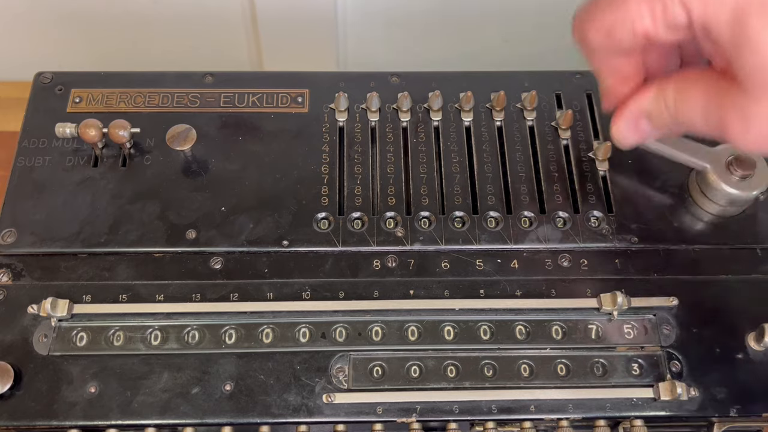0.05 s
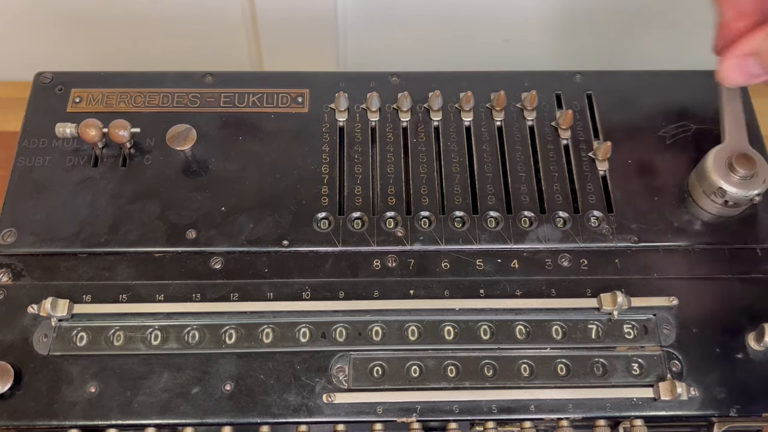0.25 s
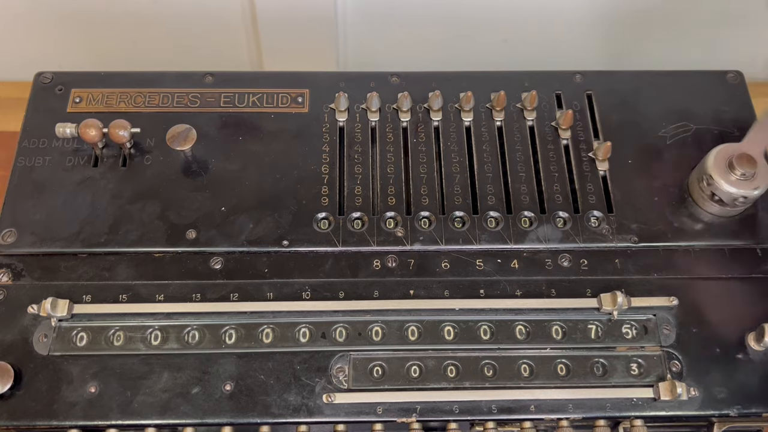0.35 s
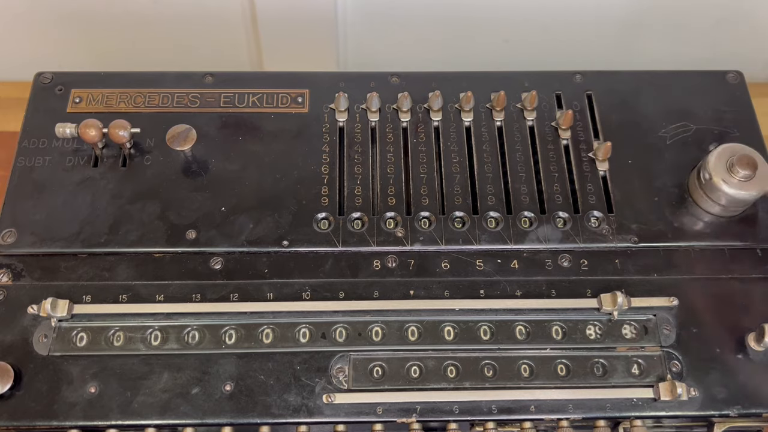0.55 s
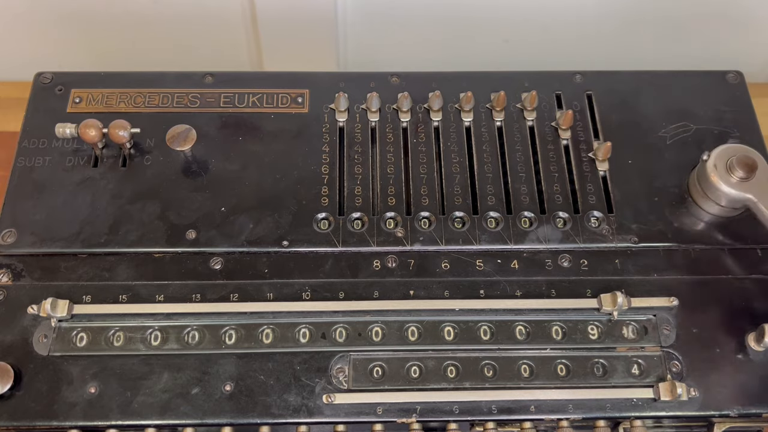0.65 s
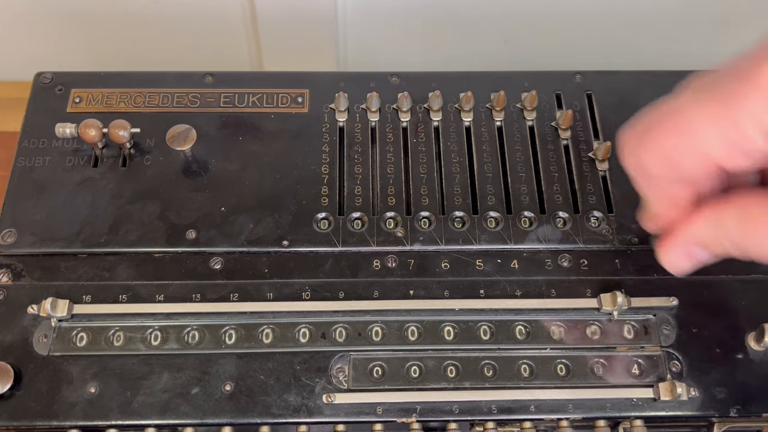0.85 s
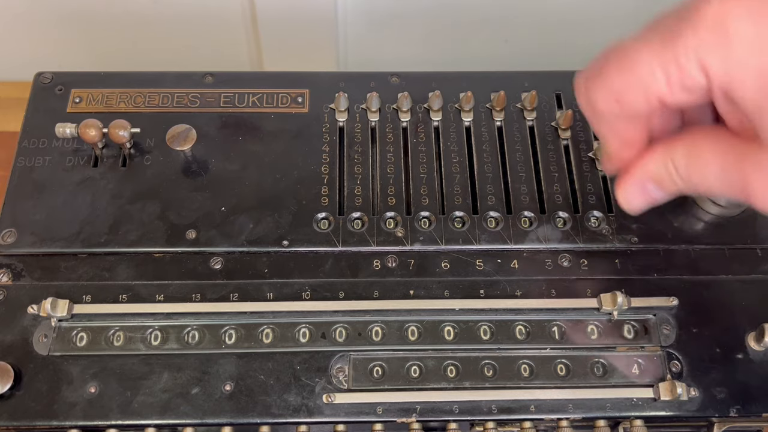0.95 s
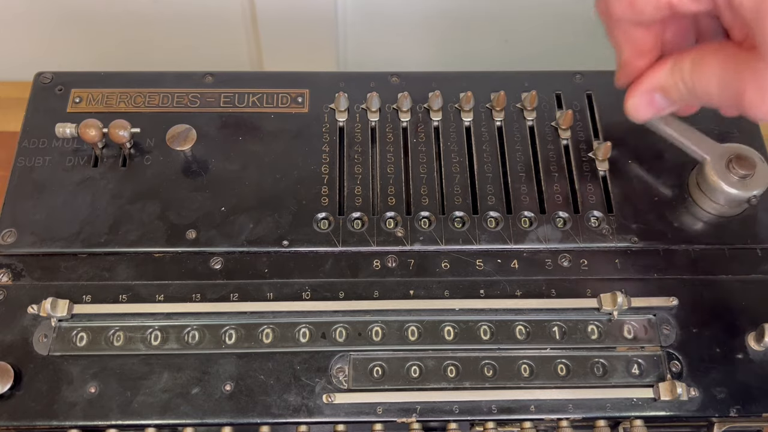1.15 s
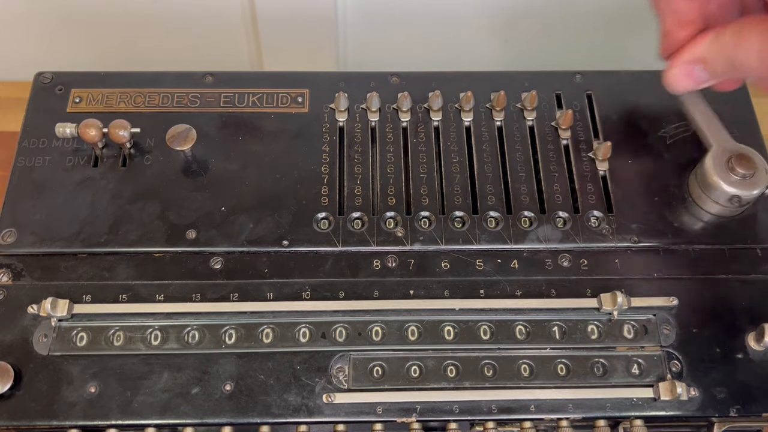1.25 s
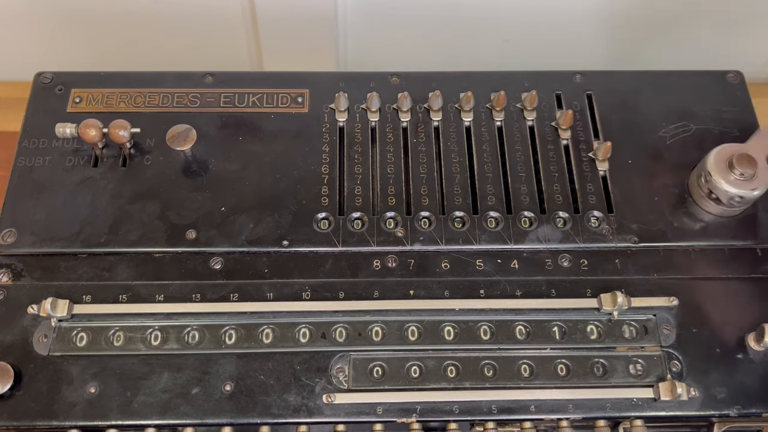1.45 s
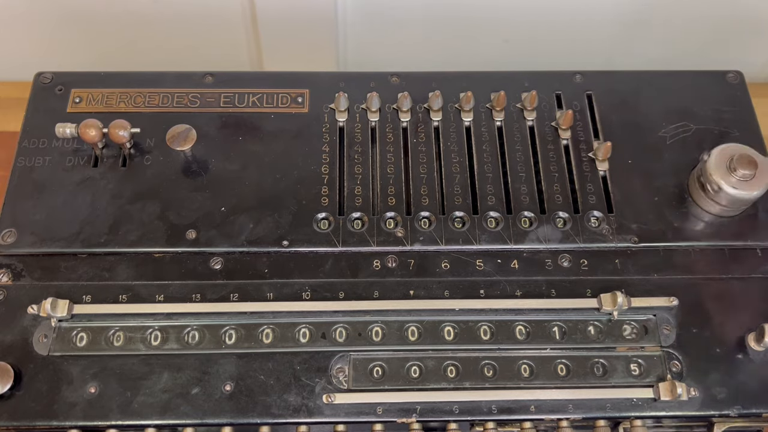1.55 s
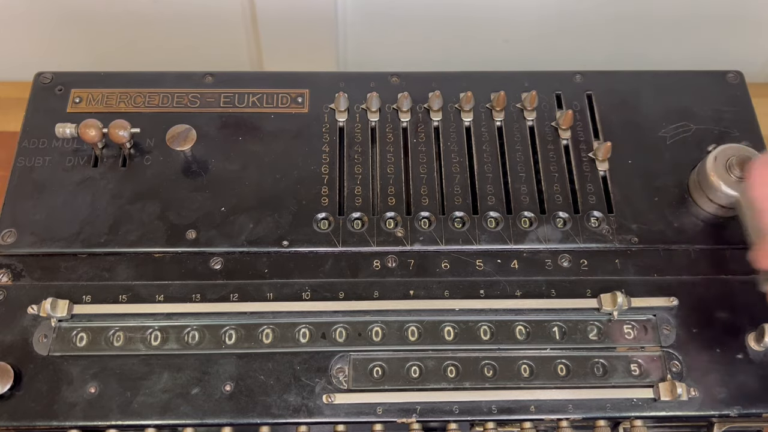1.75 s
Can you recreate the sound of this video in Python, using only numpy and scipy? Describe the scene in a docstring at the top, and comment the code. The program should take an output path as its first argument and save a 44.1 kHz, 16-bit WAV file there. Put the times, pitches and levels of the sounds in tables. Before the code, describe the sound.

A hand-cranked mechanical calculator turns twice, with ratcheting clatter and two loud clunks.

```python
"""Hand-cranked calculating machine

The crank of an old steel calculating machine is turned twice, close by, in a small room. In each turn
pawls tick over running gears, and the racks slide up, hit their stop with a loud clunk and slide back.
Between the turns the crank knocks through its rest position and the case drones. Impact and friction
excite the resonances of frame and case, and the sound dies away in a short diffuse ring."""
import sys
import numpy as np
from scipy import signal
from scipy.fft import rfft, irfft, next_fast_len
from scipy.io import wavfile

SR = 44100
rng = np.random.default_rng(int(sys.argv[2]) if len(sys.argv) > 2 else 0)


def unload_wav(signal):
    """Save mono or channel-first audio to the path in sys.argv[1] as 16-bit WAV at rate SR, clipped to [-1, 1]."""
    wavfile.write(
        sys.argv[1],
        SR,
        np.round(np.clip(np.atleast_2d(signal).T, -1, 1) * 32767).astype(np.int16),
    )


N = 79380
T = np.arange(N) / SR
EVENT_T = T[:SR // 3]

# Racks hitting their stop (all levels are relative): start_s, level_db, rise_s, t60_s
RACK_CLUNKS = [(0.236,-18,0.0034,0.031),(1.3162,-22.5,0.0027,0.022),(1.3238,-27,0.00064,0.043)]
# Racks sliding along their guides: start_s, rise_s, hold_s, level_db
RACK_SLIDES = [(.210,0.0088,0.0039,-32),(0.332,0.0011,0.029,-41),(0.379,0.0017,0.008,-41),(0.427,0.015,0.0069,-39.5),(0.487,0.0035,0.0072,-42.5),(0.642,0.0089,0.011,-52),(0.682,0.0043,0.0021,-48),
               (0.826,0.0017,0.027,-47),(0.87,0.02,0.0066,-46.5),(1.202,0.0082,0.05,-58.5),(1.276,0.006,0.0063,-44),(1.29,0.0052,0.0098,-35.5),(1.417,0.00092,0.028,-40.5),(1.453,0.0086,0.0049,-39),(1.481,0.0028,0.034,-44.5),(1.542,0.0072,0.0055,-40.5),(1.646,0.0018,0.0024,-45)]
# Clicks of pawls and gear teeth: start_s, level_db, pitch_hz
PAWL_CLICKS = [(.0121,-42,4850),(.035,-38.5,4670),(.0497,-38.5,5630),(.0565,-37,6280),(.0711,-38.5,5900),(.086,-38.5,6750),
               (.1059,-40,5100),(.1178,-40,6400),(.1324,-36.5,6300),(.1407,-51,5540),(.1575,-34,6600),(.1837,-59,6430),(.1985,-42,5500),
               (.3341,-42,5700),(.3618,-38,11700),(.380,-34.5,6970),(.3939,-39,5950),(.4311,-35,5760),(.439,-30,6270),(.4835,-34,5820),(.4946,-34.5,6000),
               (.521,-42,5400),(.5364,-45.5,5400),(.5481,-31.5,5680),(.5674,-42.5,5070),(.5893,-44,5030),(.5954,-42.5,5560),(.6038,-40.5,5620),(.6345,-47.5,4670),
               (.780,-43,6300),(.811,-38.5,5070),(.829,-37.5,6050),(.8412,-42.5,5060),(.8717,-40,5560),(.8821,-38,4880),(.9011,-43,5470),(.9117,-40,5300),(.9373,-46,5600),(.9589,-45,4440),
               (.9843,-33,5410),(1.0057,-42,4300),(1.0529,-37,5830),(1.0633,-51,5800),(1.0819,-43,5340),(1.0892,-42,6700),(1.1125,-44.5,6330),
               (1.1312,-41,6100),(1.1365,-45.5,4810),(1.1608,-48.5,5640),(1.1768,-37.5,5930),(1.1971,-59,6000),(1.2016,-39,6200),(1.2261,-34,6730),(1.2586,-50,5650),(1.2741,-42,5800),
               (1.4595,-31.5,6200),(1.4967,-41,6060),(1.5016,-40,5500),(1.5118,-27.5,6090),(1.5478,-42,5770),(1.5998,-39.5,5200),(1.6095,-46,5840),(1.6188,-50,5800),(1.629,-48,6000),
               (1.6347,-42.5,5600),(1.6506,-42,5700),(1.6802,-53,6850),(1.6885,-40.5,6100),(1.7034,-44,11700),(1.7365,-53.5,5020),(1.7874,-40.5,6040)]
# Knocks of loose levers: start_s, level_db, pitch_hz
LEVER_KNOCKS = [(.015,-48.5,1080),(.016,-48,2600),(.44,-48,1280),(.404,-44,2230),(.497,-46.5,2000),(.551,-50,1970),(.551,-55.5,930),(.604,-52.5,880),(.7435,-46,2880),(.778,-46.5,2780),(.8105,-48.5,2300),
                (.8489,-50,2180),(.874,-47.5,2080),(.8895,-50,2650),(.9373,-52,2760),(1.031,-48,3460),(1.034,-46.5,1270),(1.328,-41,1220),(1.601,-62.5,2200),(1.602,-51,880),(1.655,-54,908),(1.734,-58.5,2210),(1.787,-55.5,2680)]
# Partials of a pawl and of a lever: pitch_ratio, level_db
PAWL_PARTIALS = [(0.801,1),(1,10),(1.25,2.5),(1.5,-4),(1.8,-8),(2.1,-8)]
LEVER_PARTIALS = [(0.901,-4),(1.002,2),(1.12,-4.5),(2.2,-6.5)]
# Rattle of the running gears: time_s, level_db
GEAR_LEVELS = [(0,-56.5),(.05,-55),(.21,-46.5),(.27,-50.5),(.325,-63),(.36,-52),(.46,-56.5),(.60,-74),(.685,-49.5),(.71,-101),(.80,-70.5),(.86,-57.5),(.97,-58),(1.15,-61.5),(1.27,-61.5),(1.35,-47),(1.412,-58.5),(1.45,-66),(1.55,-50),(1.65,-69),(1.71,-86),(1.8,-80)]
# Blows that shake the case: start_s, thud_db, ring_db
CASE_BLOWS = [(.241,-38.5,-43.5),(0.778,-58.5,-54),(.828,-45,-47),(.848,-53,-56),(.880,-54,-60.5),(1.327,-40,-43)]
# Drones of the case while the gears drag: start_s, hold_s, pitch_hz, level_db
CASE_DRONES = [(0.265,0.034,208,-47.5),(0.764,0.023,138.8,-52.5),(0.812,0.11,135,-52),(0.76,0.025,209.4,-59.5),(1.08,0.068,150.3,-67.5),(1.577,0.067,206,-62)]
# Normal modes of the case: pitch_hz, level_db, t60_s
CASE_MODES = [(145,-6,0.11),(208,-7.5,0.11),(269.5,-9,0.3),(323,-11,0.2),(392,-2,0.3),(420,-8.5,0.29),(555,0,0.053),(596.5,-4.5,0.15),(679.5,0,0.1),(934.4,-1.5,0.073),(1034,-20,0.076),(1219,-14,0.031)]
# Resonances of the steel frame: pitch_hz, width_hz, gain_db
FRAME_MODES = [(2140,540,-6),(2890,83,-1.5),(3330,26,-18),(4630,240,-7),(5230,68,-7.5),(5580,200,-8.5),(6540,42,-5),(7150,23,-7)]
# Diffuse ring of works and room: frequency_hz, t60_s, level_db
REVERB_BANDS = [(150,0.57,9),(580,0.33,6),(1400,0.31,2),(3800,0.21,1),(9600,0.14,-13),(15000,0.19,-1)]
# Spectral envelopes of each source's noise: frequency_hz, level_db
CLUNK_SPECTRUM = [(100,-30),(400,-19),(700,-3),(1650,-13.5),(2200,-2),(4000,0),(5600,4.5),(8000,0),(11500,-2),(16000,-14.5)]
SLIDE_SPECTRUM = [(60,-41),(300,-10.5),(600,-4),(950,-3.5),(1550,-6.5),(2300,-2),(3800,-2),(5700,0),(8000,-0.5),(11500,-4.5),(16000,-12)]
CLICK_SPECTRUM = [(200,-62),(1500,-8),(3000,-4.5),(5200,6),(7200,0.5),(9000,2),(12000,2),(15500,-14.5)]
KNOCK_SPECTRUM = [(60,-20),(150,-10.5),(700,-4),(1500,-7),(2800,1),(5000,-7),(9000,-9),(16000,-37)]
GEAR_SPECTRUM = [(60,-43),(300,-6),(550,-0.5),(1000,-17),(1600,-7.5),(2500,-9),(3700,-3.5),(5600,3.5),(8000,0),(11500,-5.5),(16000,-23)]
THUD_SPECTRUM = [(25,-13),(70,-15.5),(130,5),(230,-28),(400,5.5),(700,-3),(800,-4.5),(950,-1),(1500,-16),(4000,-14)]
ROOM_SPECTRUM = [(25,-25),(60,-12),(100,-13),(135,9),(175,-6.5),(208,8),(250,-1),(560,-6),(750,-11),(950,-3),(1500,-14),(4000,-22.5),(9000,-56),(16000,-53)]


def racks():
    """Sliding friction makes the racks scrape and jingle; impact on the stop gives a broadband burst."""
    out, size = np.zeros(N), len(EVENT_T)
    for start_s, rise_s, hold_s, level_db in RACK_SLIDES:
        scrape = grains(size, spread_db=1.5) + amp(-0.5) * jingle(size)
        add(out, start_s, level_db, colour(scrape, SLIDE_SPECTRUM), envelope(rise_s, 0.043, hold_s))
    for start_s, level_db, rise_s, t60_s in RACK_CLUNKS:
        crash = colour(rng.standard_normal(size), CLUNK_SPECTRUM)
        add(out, start_s, level_db, crash, envelope(rise_s, t60_s))
    return out


def pawls():
    """Brief impacts on light steel pawls excite high, quickly damped modes, heard as ticks."""
    return impacts(PAWL_CLICKS, PAWL_PARTIALS, CLICK_SPECTRUM,
                   width_hz=850, noise_db=-4, rise_s=0.00094, t60_s=0.014)


def levers():
    """Impacts on loose levers build more slowly and excite lower modes, heard as knocks."""
    return impacts(LEVER_KNOCKS, LEVER_PARTIALS, KNOCK_SPECTRUM,
                   width_hz=420, noise_db=-6.5, rise_s=0.0035, t60_s=0.031)


def impacts(blows, partials, spectrum, width_hz, noise_db, rise_s, t60_s):
    """A struck part cracks, rings in damped partials and rebounds once; harder blows are brighter."""
    mean_rebound_s, rebound_db = 0.0041, -9
    pitch_scatter, scatter_db = 0.083, 3
    medium_blow_db, treble_db_per_db = -43.5, 0.36
    out, size = np.zeros(N), SR // 8
    ratios, partial_db = np.transpose(partials)
    weaker = partial_db < partial_db.max()  # only these are detuned
    strike = envelope(rise_s, t60_s)[:size]
    for start_s, level_db, pitch_hz in blows:
        detune, strength = rng.standard_normal((2, len(partials)))
        lag = int(mean_rebound_s * SR * (0.5 + rng.random()))
        rebound = amp(rebound_db) * np.pad(strike, (lag, 0))[:size]
        shape = np.hypot(strike, rebound)  # incoherent sounds add in power
        pitches = np.minimum(pitch_hz * ratios * (1 + pitch_scatter * detune * weaker), SR / 2 - 1)
        gains = amp(partial_db + scatter_db * strength)
        sound = amp(noise_db) * colour(rng.standard_normal(size), spectrum)
        for hz, gain in zip(pitches, gains / np.linalg.norm(gains)):
            noise = rng.standard_normal(2 * size)
            partial = resonance(resonance(noise, hz, width_hz), hz, width_hz)[size:]  # steady state
            sound += gain * partial * np.linalg.norm(shape) / np.linalg.norm(partial * shape)
        treble_shelf = [(6500, 0), (11000, treble_db_per_db * (level_db - medium_blow_db))]
        add(out, start_s, level_db, colour(sound, treble_shelf), shape)
    return out


def gears():
    """The many contacts of meshing teeth merge into a fine rattle that swells and fades with the crank."""
    rattle = grains(N, spread_db=7) + amp(0.5) * jingle(N)
    level_db = np.interp(T, *np.transpose(GEAR_LEVELS))
    return amp(level_db) * colour(rattle, GEAR_SPECTRUM)


def grains(size, spread_db):
    """Dense tiny contacts of uneven strength superpose into grainy noise."""
    noise = rng.standard_normal(size)
    return rms_one(noise * amp(spread_db * np.minimum(rng.exponential(1, size), 5)))


def jingle(size, parts=60, touches_per_s=2600, t60_s=0.022, spread_db=3):
    """Small steel parts, touched at random, each ping as a damped oscillator at its natural frequency."""
    pitches_hz = np.linspace(3006, 14170, parts) * rng.uniform(0.98, 1.02, parts)
    out, radius = np.zeros(size), amp(-60 / (t60_s * SR))
    touches = (rng.random(size) < touches_per_s / SR) * amp(spread_db * rng.standard_normal(size))
    touched_part = rng.integers(0, parts, size)
    for part, omega in enumerate(2 * np.pi * pitches_hz / SR):
        force = touches * (touched_part == part) + 1e-18
        out += signal.lfilter([1, 0, -1], [1, -2 * radius * np.cos(omega), radius ** 2], force)
    return rms_one(out)


def case():
    """Heavy blows make the case thud and ring in free vibration; dragging gears drive a low drone."""
    out, swell_cycles = np.zeros(N), 3.4
    for start_s, thud_db, ring_db in CASE_BLOWS:
        thud = colour(rng.standard_normal(len(EVENT_T)), THUD_SPECTRUM)
        add(out, start_s, thud_db, thud, envelope(rise_s=0.0068, t60_s=0.28))
        for hz, mode_db, t60_s in CASE_MODES:
            level_db = ring_db + mode_db + rng.normal(0, 1)
            mode = np.sin(2 * np.pi * (hz * EVENT_T + rng.random()))
            add(out, start_s, level_db, mode, envelope(swell_cycles / hz, t60_s))
    for start_s, hold_s, hz, level_db in CASE_DRONES:
        drone = np.sin(2 * np.pi * hz * (EVENT_T + start_s))
        add(out, start_s, level_db, drone, envelope(rise_s=0.0093, t60_s=0.091, hold_s=hold_s))
    return out


def housing(drive, panel_db=3.5):
    """In forced vibration, frame and case panels reinforce the sound near their natural frequencies."""
    frame = sum(amp(db) * resonance(drive, hz, width_hz) for hz, width_hz, db in FRAME_MODES)
    panels = sum(amp(panel_db + db) * resonance(drive, hz, width_hz=np.log(1000) / (np.pi * t60_s))
                 for hz, db, t60_s in CASE_MODES)
    return frame + panels


def reverberation(x, build_s=0.0043):
    """Diffuse reflections in the works and the room decay exponentially, faster in the treble."""
    hz, t60_s, level_db = np.transpose(REVERB_BANDS)
    edges_hz, response = np.geomspace(100, 17000, 12), 0
    for low, high in zip(edges_hz, edges_hz[1:]):
        bandpass = signal.butter(2, [low, high], "band", fs=SR, output="sos")
        band = signal.sosfilt(bandpass, rng.standard_normal(len(EVENT_T)))
        centre_hz = np.sqrt(low * high)
        gain = amp(at_hz(np.c_[hz, level_db], centre_hz))
        response += gain * band * envelope(build_s, at_hz(np.c_[hz, t60_s], centre_hz))
    return signal.fftconvolve(x, response / np.linalg.norm(response))[:N]


def room_noise():
    """The background of the room is stationary noise with most of its power in the bass."""
    return colour(rng.standard_normal(N), ROOM_SPECTRUM)


def amp(db):
    """Decibels to amplitude ratio."""
    return 10 ** (np.asarray(db) / 20)


def rms_one(x):
    """Normalisation to rms 1."""
    return x / np.sqrt(np.mean(x ** 2) + 1e-20)


def at_hz(points, hz):
    """Interpolation on a log-frequency axis."""
    frequencies, values = np.transpose(points)
    return np.interp(np.log(np.maximum(hz, 1)), np.log(frequencies), values)


def colour(x, spectrum):
    """Minimum-phase filtering imposes a spectral envelope; the result has rms 1."""
    size = next_fast_len(len(x)) * 2
    bins_hz = np.arange(size // 2 + 1) * SR / size
    cepstrum = irfft(np.log(amp(at_hz(spectrum, bins_hz))))
    cepstrum[1:size // 2] *= 2  # folding the cepstrum makes the filter causal
    cepstrum[size // 2 + 1:] = 0
    return rms_one(irfft(rfft(x, size) * np.exp(rfft(cepstrum)))[:len(x)])


def resonance(x, hz, width_hz):
    """A two-pole resonator with unit gain at its peak."""
    radius = np.exp(-np.pi * width_hz / SR)
    feedback = [1, -2 * radius * np.cos(2 * np.pi * hz / SR), radius ** 2]
    return signal.lfilter(np.array([1, 0, -1]) * (1 - radius ** 2) / 2, feedback, x)


def envelope(rise_s, t60_s, hold_s=0):
    """Linear rise, hold, then exponential decay by 60 dB in t60_s."""
    decay_s = np.maximum(EVENT_T - rise_s - hold_s, 0)
    return np.minimum(EVENT_T / rise_s, 1) * amp(-60 * decay_s / t60_s)


def add(out, start_s, level_db, sound, shape):
    """Superposition of a sound under an envelope whose top has the given rms level."""
    start, shaped = int(start_s * SR), sound * shape
    shaped *= amp(level_db) * np.linalg.norm(shape) / np.linalg.norm(shaped)
    out[start:start + len(shaped)] += shaped[:max(N - start, 0)]


def scene():
    """Direct sound, housing resonances and reverberation superpose over the quiet room."""
    parts = amp(2) * pawls() + levers() + racks() + gears()
    works = amp(-2.5) * (parts + housing(parts))
    background = amp(-67.5) * room_noise()
    return (works + amp(-11) * reverberation(works) + amp(-4) * case() + background)[None]


def record(dry):
    """A steep elliptic low-pass limits the bandwidth to 16 kHz."""
    return signal.sosfilt(signal.ellip(10, 0.2, 70, 16000, fs=SR, output="sos"), dry)


dry = scene()
out = record(dry)
unload_wav(out)
```